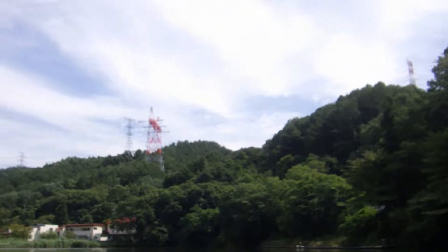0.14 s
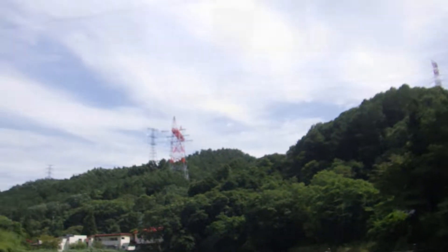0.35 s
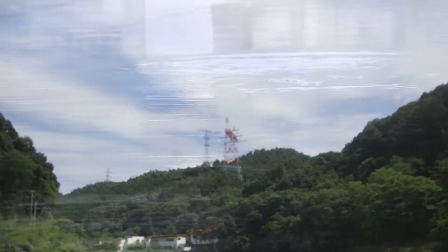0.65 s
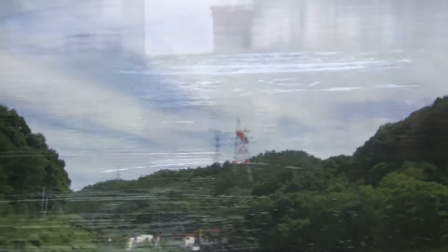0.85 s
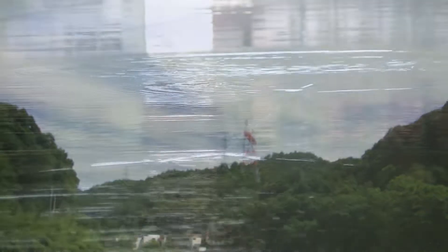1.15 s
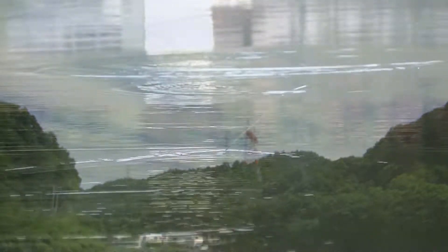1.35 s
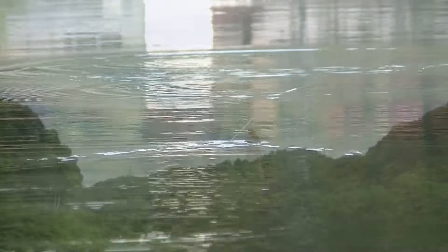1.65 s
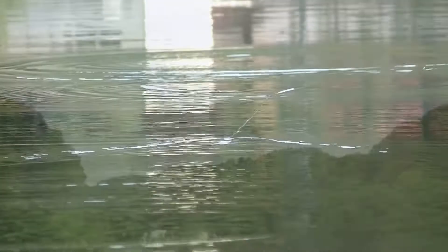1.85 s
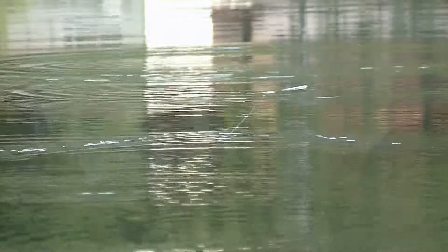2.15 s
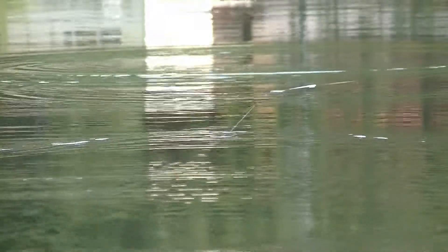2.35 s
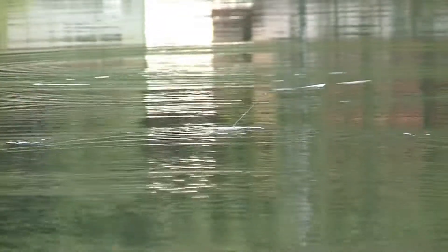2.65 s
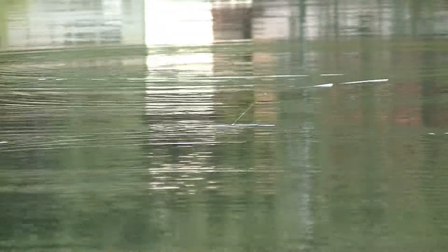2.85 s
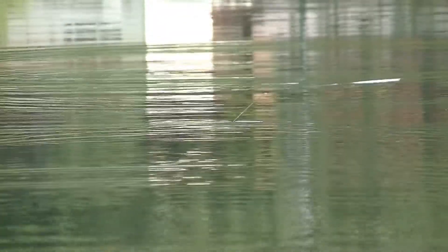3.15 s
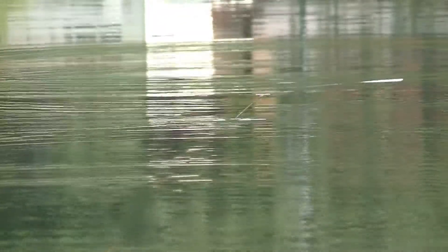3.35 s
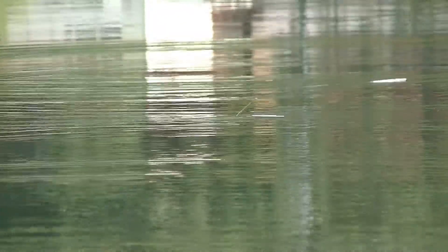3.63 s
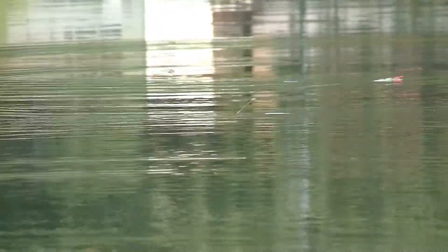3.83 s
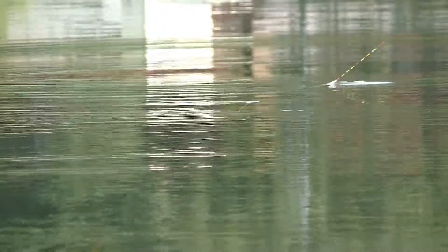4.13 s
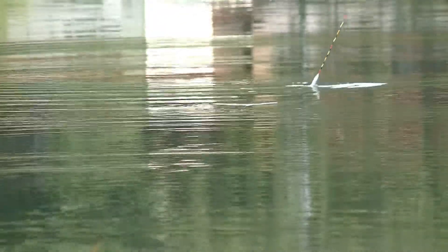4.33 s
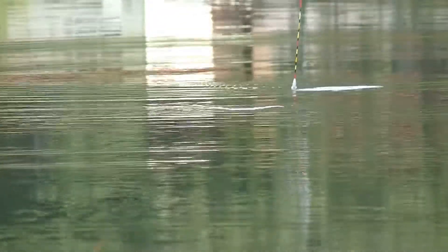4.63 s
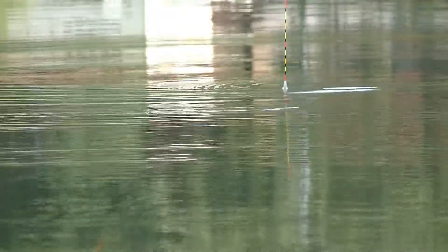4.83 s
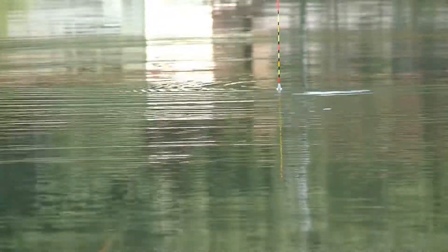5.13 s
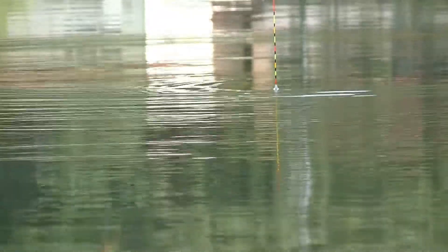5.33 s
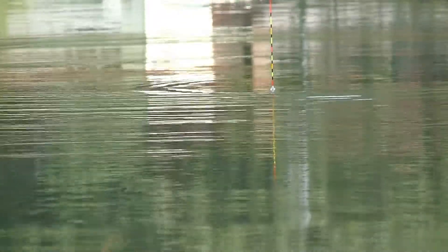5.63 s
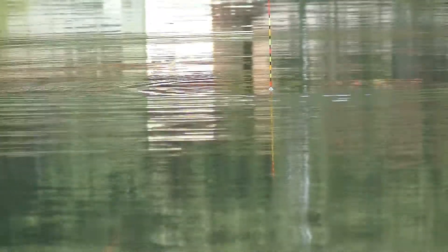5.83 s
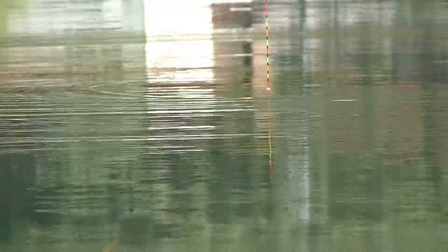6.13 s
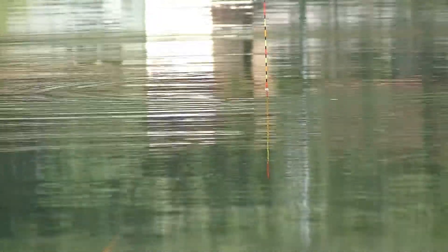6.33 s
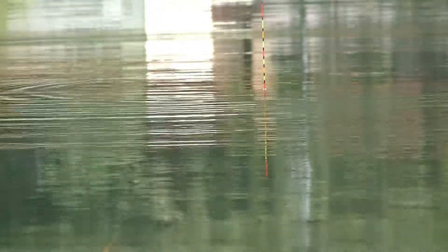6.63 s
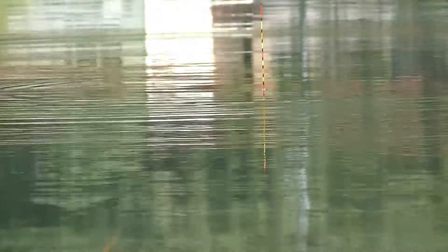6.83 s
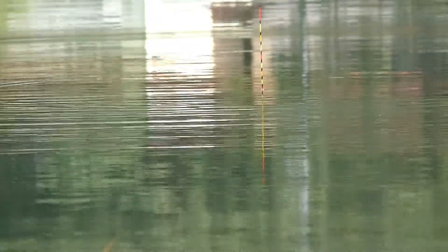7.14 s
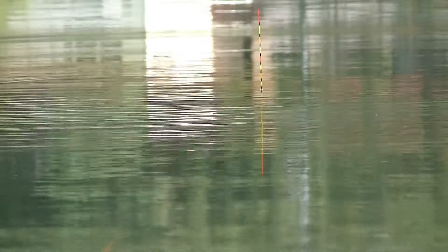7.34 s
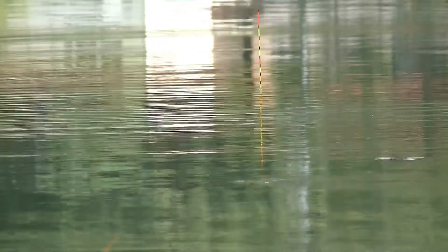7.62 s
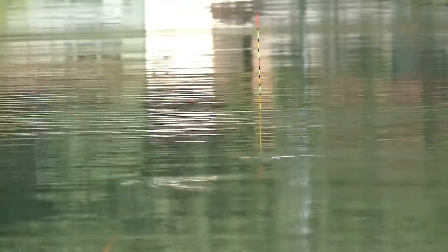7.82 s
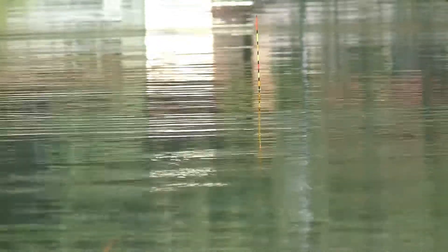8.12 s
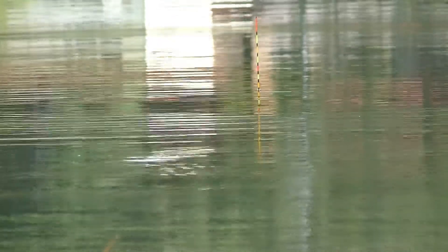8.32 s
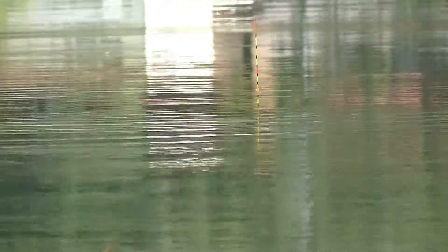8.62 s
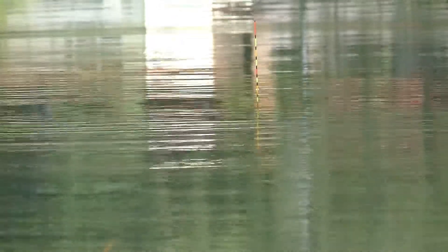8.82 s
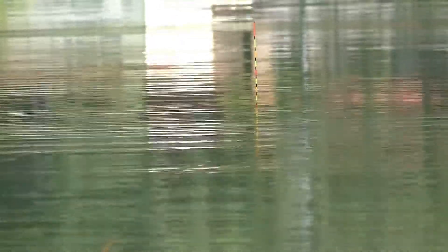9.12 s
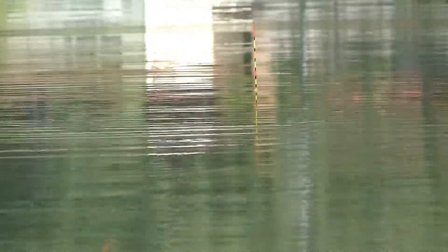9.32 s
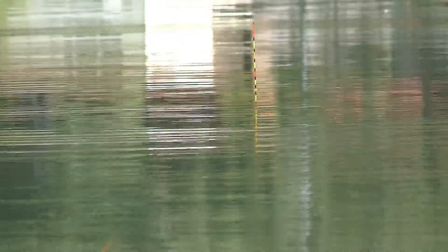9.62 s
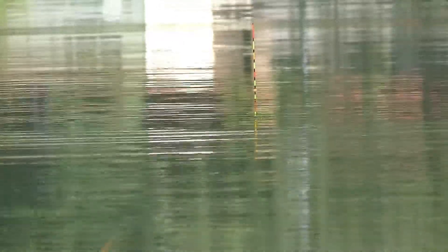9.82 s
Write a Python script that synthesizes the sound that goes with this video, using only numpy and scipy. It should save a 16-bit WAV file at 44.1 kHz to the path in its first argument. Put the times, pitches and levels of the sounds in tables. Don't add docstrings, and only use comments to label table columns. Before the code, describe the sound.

A low engine drone and soft wind thumps fade within two seconds into a steady, shrill, fast-fluttering cicada chorus beside a lake, leaning left.

```python
import sys
import numpy as np
from scipy import signal
from scipy.fft import rfft, irfft, next_fast_len
from scipy.io import wavfile
from scipy.ndimage import uniform_filter1d, map_coordinates

SR = 44100
rng = np.random.default_rng(int(sys.argv[2]) if len(sys.argv) > 2 else 0)


def volts_from_decibels(level):
    exponent = np.asarray(level, float) / 20
    return 10 ** exponent


def transcribe(signal):
    frames = np.atleast_2d(signal).T
    limited = np.clip(frames, -1, 1)
    pcm = np.round(limited * 32767).astype(np.int16)
    wavfile.write(sys.argv[1], SR, pcm)


N = 439677
COARSE = np.arange(0, N + 32, 32)


def unit(x):
    return x / np.sqrt(np.mean(x ** 2) + 1e-20)


def along(points, hz):
    f, v = np.transpose(points)
    return np.interp(np.log(hz + 1), np.log(f + 1), v)


def curves(rows):
    s, *cols = np.transpose(rows)
    return [np.interp(np.arange(N) / SR, s, c) for c in cols]


def wobble(rate):
    knots = rng.standard_normal(int(N * rate / SR) + 4)
    return np.interp(np.arange(N), COARSE, map_coordinates(knots, [COARSE * rate / SR]))


def swells(rows, edge):
    t = COARSE / SR
    gain = 0
    for s, length, db in rows:
        inside = np.clip(np.minimum(t - s, s + length - t) / edge, 0, 1)
        gain = gain + volts_from_decibels(db) * np.sin(np.pi / 2 * inside) ** 2
    return np.interp(np.arange(N), COARSE, gain)


def filtered(x, response):
    m = next_fast_len(N + SR // 2)
    return irfft(rfft(x, m) * response(np.fft.rfftfreq(m, 1 / SR)), m)[..., :N]


def coloured(x, spectrum):
    return unit(filtered(x, lambda hz: volts_from_decibels(along(spectrum, hz))))


def hiss(spectrum, patchy_db):
    z = signal.stft(rng.standard_normal(N), nperseg=512)[2]
    field = uniform_filter1d(rng.standard_normal(z.shape), size=3, axis=0)
    field = uniform_filter1d(field, size=8, axis=1)
    patchy = signal.istft(z * volts_from_decibels(patchy_db * unit(field)), nperseg=512)[1]
    return coloured(patchy[:N], spectrum)


def beats(rate, jitter):
    done = np.cumsum(rate) / SR
    s = np.interp(np.arange(1, int(done[-1])), done, np.arange(N) / SR)
    return np.clip(s + jitter * rng.standard_normal(2500)[:len(s)], 0, N / SR)


def pings(s, hz, db, t60, rise):
    first = np.ceil(s * SR).astype(int)
    at = first[:, None] + np.arange(800)
    t = at / SR - s[:, None]
    loudness = volts_from_decibels(np.asarray(db)[..., None] - 60 * t / t60) * (1 - np.exp(-t / rise))
    ring = loudness * np.sin(2 * np.pi * np.asarray(hz)[..., None] * t)
    return np.bincount(at.ravel(), ring.ravel(), N + 1000)[:N]


def bursts(s, hz, db, half, lag):
    at = np.round(s * SR).astype(int)[:, None] + np.arange(192)
    t = (at - 96) / SR - s[:, None]
    swell = volts_from_decibels(db)[:, None] * np.exp(-.5 * ((t - lag) / half) ** 2)
    tone = swell * np.cos(2 * np.pi * (hz[:, None] * t - SLIP_HZ * s[:, None]))
    return np.bincount(at.ravel(), tone.ravel(), N + 1000)[96:N + 96]


# t/s, length/s, level/dB
ENGINE_SURGES = [
    [(-.1, 0.79, -45.5), (.62, 0.51, -47), (1.1, 0.19, -46.5), (1.25, 0.266, -45.5)],
    [(-.1, .74, -43), (.66, .4, -50), (1.2, 0.13, -44.5)],
]
ENGINE_HZ = [50.6, 93]


def engine_drone():
    t = np.arange(N) / SR
    drone = 0
    for surges, hz in zip(ENGINE_SURGES, ENGINE_HZ):
        turn = 2 * np.pi * hz * t + 0.95 * wobble(8.9)
        drone = drone + np.sqrt(2) * swells(surges, edge=0.062) * np.sin(turn)
    return drone


# t/s, length/s, level/dB
GUSTS = [
    (-.1, 1.65, -50.5),
    (.08, 0.12, -51),
    (1.4, 0.86, -60),
    (1.63, 0.25, -41.5),
    (1.8, 0.17, -54),
    (2.0, 0.17, -67),
]
# f/Hz, level/dB
WIND_TONE = [(12, -40), (20, -12.5), (38, -4), (86, -2.5), (169, -17), (231, -25.5), (320, -35), (420, -66),
             (700, -120)]


def wind():
    return swells(GUSTS, edge=0.074) * hiss(WIND_TONE, patchy_db=2.0)


# f/Hz, level/dB
ROAD_TONE = [(88, -29), (150, 2), (242, -10.5), (352, -3.5), (923, -8.5), (1820, -18), (2520, -23),
             (3000, -25.5), (3900, -61), (6600, -120)]
# f/Hz, level/dB
HOLLOW_TONE = [(2500, -18.5), (3700, -16), (4550, -2), (5400, -10), (6000, -7.5), (6600, -15), (7600, -18),
               (8300, -34), (10000, -29.5), (15500, -39.5)]
# f/Hz, width/Hz
NOTCHES = [(3200, 700), (4080, 260), (5130, 330), (5680, 280), (7130, 400), (8200, 150)]


def hollow_outdoors():
    def notched(f):
        cuts = [(c * c - f * f + .02j * f * w) / (c * c - f * f + 1j * f * w) for c, w in NOTCHES]
        return np.prod(cuts, axis=0)

    outside = volts_from_decibels(-48.5) * hiss(HOLLOW_TONE, patchy_db=1.5)
    outside += volts_from_decibels(-51.5) * hiss(ROAD_TONE, patchy_db=0.5)
    return filtered(outside, notched)


def roadside(left):
    return engine_drone() + wind() + left * hollow_outdoors()


# f/Hz, level/dB
CHORUS_TONE = [(1180, -53), (2000, -34), (3270, -16.5), (4060, -9), (4710, -1.5), (5310, 1.5), (6160, -4),
               (7130, -4.5), (8700, -15), (9100, -20), (10100, -27.5), (11200, -21), (13500, -16.5),
               (15800, -21)]


def far_chorus():
    return volts_from_decibels(-41) * hiss(CHORUS_TONE, patchy_db=1.25)


# f/Hz, level/dB
VALLEY_TONE = [(18, -60), (30, -29), (184, -17.5), (255, -11), (303, -5), (404, -2.5), (454, -3.5),
               (809, 1), (1960, -9.5), (3000, -8), (3900, -29), (6600, -120)]


def valley_hum():
    return volts_from_decibels(-57) * coloured(rng.standard_normal(N), VALLEY_TONE)


# t/s, clicks per second, belly pumps per second
SINGER = [(0, 195.3, 14.51), (2.2, 195.5, 14.07), (2.7, 195.9, 14.53), (3.3, 196.1, 14.41),
          (4.4, 196.3, 14.83), (5.3, 196.6, 14.38), (6.2, 198.0, 15.02), (7.0, 196.9, 14.37),
          (7.3, 196.5, 14.62), (7.7, 197.8, 14.95), (9.97, 199.7, 14.87)]
# f/Hz, level/dB
BELLY_TONE = [(5300, 1), (5800, -1), (6200, -5), (7000, 4.5), (7600, -2), (8300, -12)]
# f/Hz, half-length/s, level/dB
SHELL = [
    (15250, .00055, -8),
    (14300, .0005, -14),
]
PUMP_START = -.218
SLIP_HZ = 50


def near_cicada():
    clicks, pumps = curves(SINGER)
    s = beats(clicks, jitter=.000006)
    at = np.minimum(s * SR, N - 1).astype(int)
    turn = 2 * np.pi * (PUMP_START + np.cumsum(pumps)[at] / SR)
    raised = .5 + .5 * np.cos(turn)
    chance = rng.standard_normal((2500, 4))[:len(s)]
    hz = 5550 + 2500 * (.5 + .5 * np.cos(turn + .1)) ** 0.92
    push_db = 1.5 * chance[:, 0] - 1.5 * np.sin(turn)
    song = bursts(s, hz, along(BELLY_TONE, hz) + push_db, half=.00045, lag=.00005)
    song += bursts(s, np.full(len(s), 5750), chance[:, 1] - 5, half=.00022, lag=0)
    opened_db = push_db + 1.2 * chance[:, 3] - 25 / (1 + np.exp((raised - .4) / .08))
    for mode_hz, half, db in SHELL:
        song += bursts(s, mode_hz + 150 * chance[:, 2], opened_db + db, half, lag=.0003)
    level_db = -44 - 0.21 * np.arange(N) / SR
    return volts_from_decibels(level_db) * unit(song)


# t/s, peak level/dB, f/Hz
KNOCKS = [
    (0.5644, -37, 2460),
    (0.9294, -54, 2890),
    (1.056, -42, 2210),
    (1.0937, -41.5, 2410),
    (1.1957, -50, 1820),
    (1.3329, -48, 1740),
    (1.9694, -57, 3190),
]


def knocks():
    s, db, hz = np.transpose(KNOCKS)
    out = np.zeros(N)
    for ratio, share_db in [(.78, -8), (1, -25), (1.25, -8)]:
        out += pings(s, hz * ratio, db + share_db, t60=.015, rise=.0002)
    crack_tone = [(700, -40), (1300, 2), (2500, 3), (3800, -4), (6000, -36)]
    crack = coloured(rng.standard_normal(N), crack_tone)
    return out + crack * np.abs(pings(s, 11.3, db + 15, t60=0.032, rise=.0002))


# overtone number, swells (t/s, length/s, level/dB), loss while raised/dB
RINGING = [
    (29, [(6.3, 1.5, -57), (7.6, 2.0, -50.5)], 6.5),
    (30, [(1.5, 2.6, -60), (3.7, 2.4, -51)], 12),
]


def ringing():
    clicks, pumps = [np.cumsum(rate) / SR for rate in curves(SINGER)]
    raised = .5 + .5 * np.cos(2 * np.pi * (PUMP_START + pumps) - .4)
    out = np.zeros(N)
    for order, rows, lost_db in RINGING:
        cycles = order * clicks - SLIP_HZ * np.arange(N) / SR
        tone = np.sin(2 * np.pi * cycles + .5 * wobble(10))
        out += swells(rows, edge=0.39) * unit(volts_from_decibels(0.91 * wobble(8) - lost_db * raised) * tone)
    return out


# t/s, length/s, level/dB
WHISTLE = [
    (1.5, 8.8, -64),
    (3.9, 1.7, -57),
    (5.5, 1.0, -62),
]


def whistler():
    t = np.arange(N) / SR
    flutter_db = 2 * np.sin(2 * np.pi * 30 * t + wobble(3)) + 1.8 * wobble(6)
    tone = np.sin(2 * np.pi * 5481 * t + 0.74 * wobble(14))
    return swells(WHISTLE, edge=0.43) * unit(volts_from_decibels(flutter_db) * tone)


def steady_cicada(rows, rate, hz, t60, edge):
    s = beats(rate * (1 + 0.004 * wobble(1.5)), jitter=0.0002)
    chance = rng.standard_normal((2500, 2))[:len(s)]
    song = pings(s, hz * (1 + .012 * chance[:, 0]), 1.8 * chance[:, 1], t60, rise=.001)
    return swells(rows, edge) * unit(song)


# t/s, length/s, level/dB
RATTLE = [
    (2, 8.5, -64),
    (3.4, 3.2, -60),
    (7.0, 2.6, -59),
    (7.1, 1.6, -62),
]


def rattling_cicada():
    return steady_cicada(RATTLE, 47.8, hz=4720, t60=.012, edge=.8)


# t/s, level/dB, f/Hz, length/s
BIRDS = [(2.6, -59, 4050, .08), (5.32, -57, 3640, .07), (5.3, -61, 3990, .12), (5.43, -60, 3830, .12),
         (5.48, -61, 3650, .07), (5.66, -57, 4140, .09), (5.73, -59, 4330, .08), (5.85, -54, 3860, .06),
         (5.87, -61, 3480, .04), (6.39, -58, 4150, .07), (6.45, -53, 4160, .07), (6.94, -60, 3600, .04),
         (6.96, -56, 4110, .11), (7.09, -55, 4110, .12), (7.12, -56, 3740, .05), (7.7, -62, 4000, .06),
         (7.72, -60, 3490, .05)]


def birds():
    out = np.zeros(N)
    for s, db, hz, length in BIRDS:
        t = np.arange(int(length * SR)) / SR
        bend = .05 if hz > 3950 else -.04
        note = np.sin(2 * np.pi * hz * t * (1 + bend * (t - length)))
        out[round(s * SR):][:len(t)] += volts_from_decibels(db + .8) * np.sin(np.pi * t / length) * note
    return out


# t/s, level/dB, length/s, f/Hz
SCUFFS = [
    (3.645, -53, .055, 2500),
    (6.52, -58, .04, 3600),
]


def scuffs():
    noise = rng.standard_normal(N)
    out = np.zeros(N)
    for s, db, length, hz in SCUFFS:
        t = np.arange(N) / SR - s
        tone = [(hz / 4, -40), (hz / 1.6, -3), (hz, 0), (hz * 1.5, -3), (hz * 4, -5.5), (hz * 5, -40)]
        out += volts_from_decibels(db) * coloured(noise, tone) * np.sin(np.pi * np.clip(t / length, 0, 1))
    return out


# t/s, length/s, level/dB
BUZZ = [
    (7.9, 1.26, -63.5),
]


def buzzing_cicada():
    return steady_cicada(BUZZ, 119, hz=3560, t60=.02, edge=.25)


# f/Hz, time to fall 60 dB/s
WOODS = [(1000, 0.19), (6000, 0.94), (15000, 0.074)]


def woods(x):
    hz, t, z = signal.stft(rng.standard_normal((2, SR // 2)), SR, nperseg=256)
    dying = volts_from_decibels(-60 * t / along(WOODS, hz)[:, None])
    tail = signal.istft(z * dying, SR, nperseg=256)[1]
    return signal.fftconvolve(x[None], tail / np.linalg.norm(tail[0]), axes=1)[:, :N]


# f/Hz, likeness from 0 to 1
ALIKE = [(100, .2), (400, 0.56), (1400, 0.5), (3100, 0.43), (5500, 0.93), (8000, 0.15), (11000, 0.22),
         (15000, 0.17)]
# f/Hz, phase/radians
LEAD = [(340, -1.5), (1030, -1.0), (4220, -.4), (6630, -1.3), (8440, -1.6), (10200, -2.2), (15100, -2)]
# f/Hz, level/dB
LEAN = [(60, -2), (150, 9), (380, 13), (950, 11.5), (2380, 7.5), (4400, 6), (6000, 7), (9000, 8),
        (15000, -1)]
# f/Hz, level/dB
SHADE = [(5000, 6.5), (6100, -6.5), (6600, 6), (7100, -5), (7700, -40), (8300, 12), (14000, 0),
         (15500, -11)]


def ports(same, other, near):
    def alike(hz):
        return np.clip(along(ALIKE, hz), 0, 1)

    def across(hz):
        return np.exp(-1j * along(LEAD, hz)) * volts_from_decibels(-along(LEAN, hz))

    right = filtered(same, lambda hz: alike(hz) * across(hz))
    right += filtered(other, lambda hz: np.sqrt(1 - alike(hz) ** 2) * volts_from_decibels(-along(LEAN, hz)))
    right += filtered(near, lambda hz: across(hz) * volts_from_decibels(along(SHADE, hz)))
    return np.array([same + near, right])


def lake():
    drift = volts_from_decibels(0.1 * wobble(1.27))
    bed = [drift * (far_chorus() + valley_hum()) for ear in range(2)]
    voices = near_cicada() + ringing() + whistler() + rattling_cicada() + buzzing_cicada() + birds()
    echo = volts_from_decibels(-8) * woods(voices)
    return ports(echo[0] + bed[0], echo[1] + bed[1], voices + knocks() + scuffs())


DISSOLVE = (.27, 2.25)


def scene():
    arrived = np.interp(np.arange(N) / SR, DISSOLVE, [0, 1])
    return roadside(1 - arrived) + arrived * lake()


def top_cut(x):
    return signal.sosfilt(signal.butter(12, 16550, fs=SR, output="sos"), x)


def record(dry):
    mix = filtered(dry, lambda hz: hz < 15745)
    return top_cut(mix)


dry = scene()
out = record(dry)
transcribe(out)
```